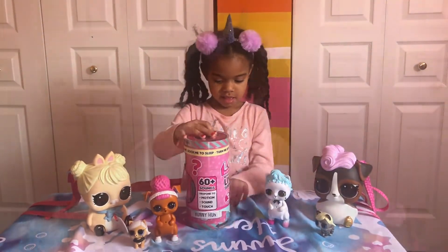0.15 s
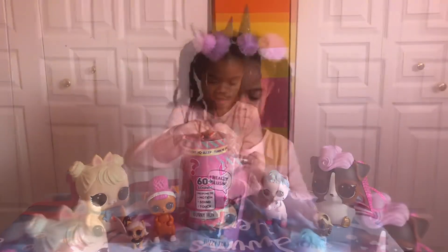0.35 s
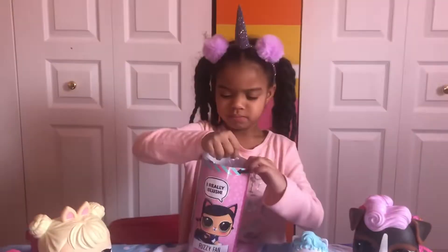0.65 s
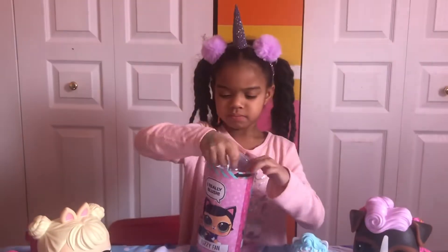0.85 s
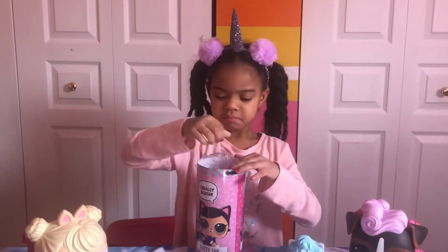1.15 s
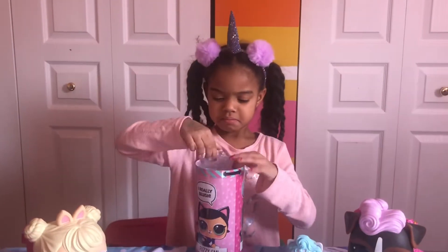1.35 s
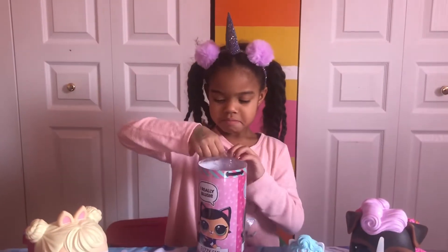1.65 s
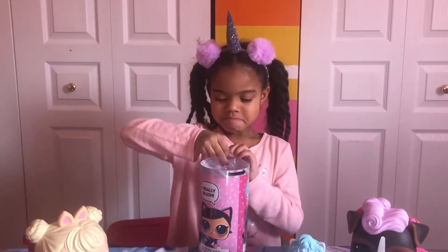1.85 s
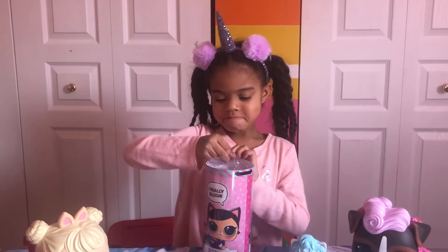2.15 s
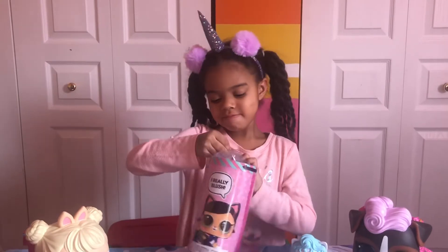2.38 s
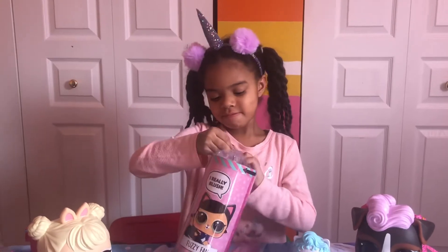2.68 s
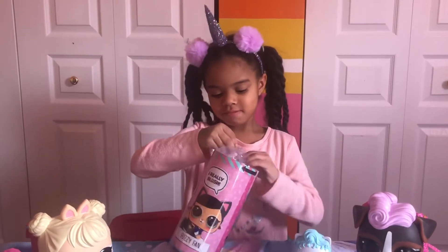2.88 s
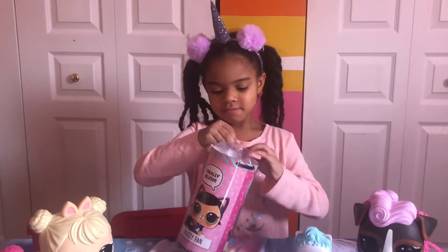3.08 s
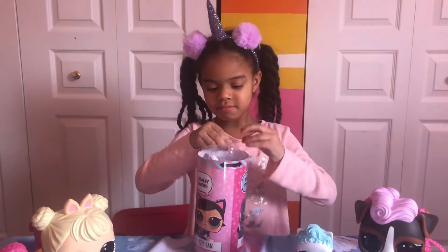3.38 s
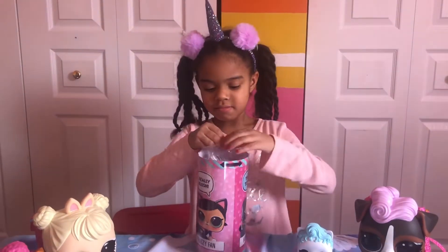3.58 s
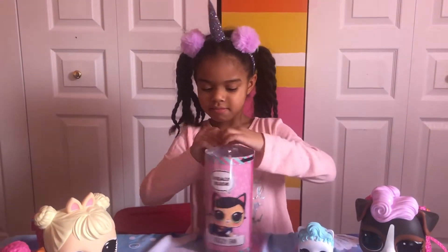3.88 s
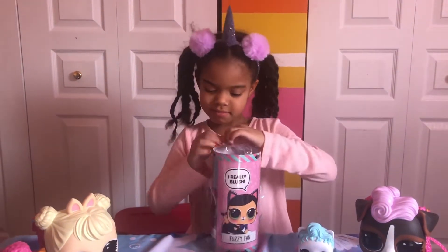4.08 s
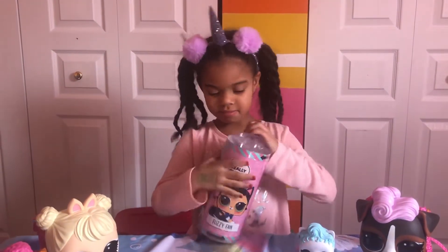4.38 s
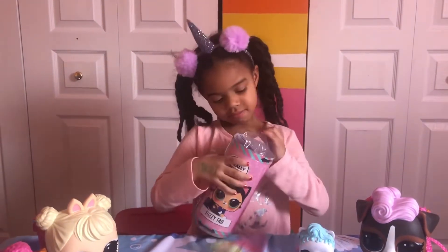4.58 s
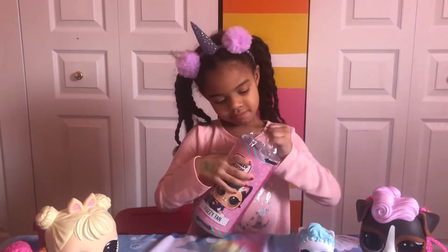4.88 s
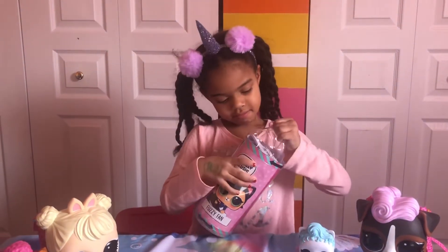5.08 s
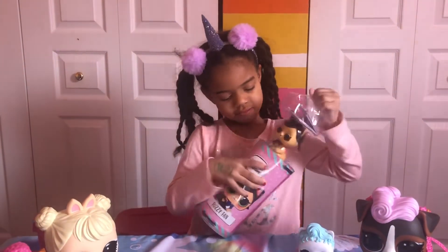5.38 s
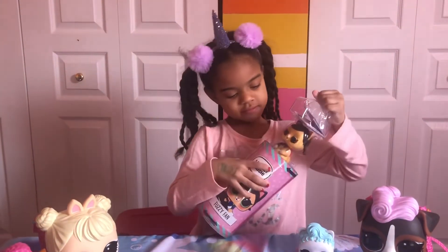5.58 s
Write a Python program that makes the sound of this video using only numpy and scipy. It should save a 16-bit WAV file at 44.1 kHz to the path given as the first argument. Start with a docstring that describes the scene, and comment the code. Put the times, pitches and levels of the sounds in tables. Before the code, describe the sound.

A small room with quiet air and a faint low rumble that swells briefly at the start. Fingers grip stiff plastic in a hollow tube: soft crinkling, then a dense rustle at 0.3 s and hard, hollow pops from 0.5 to 0.7 s. From 0.85 to 2 s there is only light rubbing and small ticks. A sharp, bright snap at 2.1 s leads into busy crinkling until about 2.45 s. The tube wall judders low at 2.5 s and again around 3 to 3.3 s, with a crack at 2.8 s and fine rim ticks. After quieter fumbling, thin squeaks near 3 kHz chirp at 4.1 to 4.25 s. Cracks gather from 4.26 to 4.9 s, then the strongest cluster bursts at 5.14 to 5.26 s, with a soft low puff of air. Light crinkling follows, and a last snap at 5.68 s. Close microphone, short bright reflections.

```python
"""A small room, where stiff clear plastic is prised out of a tube-shaped container by hand.
The sheet buckles in short cracks: each is a bright noise burst, a ringing facet and a thump of tube modes.
Between them the fingers work the plastic: clicks crinkle, filtered slips rub, unsteady whistles squeak.
Later the tube wall judders, the rim ticks over the lip and a soft puff of air follows.
The microphone hears these directly, with the room's reflections over quiet air and a low rumble."""
import sys
import numpy as np
from scipy import signal
from scipy.fft import rfft, irfft
from scipy.io import wavfile

SR = 44100
rng = np.random.default_rng(int(sys.argv[2]) if len(sys.argv) > 2 else 0)


def pcm_store(signal):
    """Save signal as 16-bit PCM."""
    levels = np.round(np.clip(np.atleast_2d(signal), -1, 1) * 32767)
    wavfile.write(sys.argv[1], SR, levels.astype(np.int16).T)


N = 253273
TIME = np.arange(N) / SR  # s


def amp(db):
    """Decibels to gain."""
    return 10 ** (np.asarray(db) / 20)


def evened(x):
    """Scales to rms 1."""
    return x / np.sqrt(np.mean(x ** 2) + 1e-20)


def at_level(x, db, span_s=0.01):
    """Gives a short sound the energy of a steady sound of that rms level lasting span_s."""
    return amp(db) * x * np.sqrt(span_s * SR / (np.sum(x ** 2) + 1e-20))


def read(points, hz):
    """Reads a table of values against frequency on a log-frequency axis."""
    f, value = np.transpose(points)
    return np.interp(np.log(hz + 1), np.log(f + 1), value)


def add(mix, s, sound):
    """Mixes a sound in at time s."""
    part = mix[max(round(s * SR), 0):][:len(sound)]
    part += sound[:len(part)]


def colour(x, spectrum, size=4096):
    """Causal (minimum-phase) filter with the given spectrum."""
    log_gain = np.log(amp(read(spectrum, abs(np.fft.fftfreq(size, 1 / SR)))))
    taps = np.fft.ifft(np.exp(np.conj(signal.hilbert(log_gain)))).real
    return signal.fftconvolve(x, taps[:size // 2])[:len(x)]


def resonate(x, hz, width_hz):
    """One damped mode: a two-pole resonance."""
    r = np.exp(-np.pi * width_hz / SR)
    return signal.lfilter([1 - r, 0, r - 1], [1, -2 * r * np.cos(2 * np.pi * hz / SR), r * r], x)


def wander(rate_hz):
    """Random values of rms 1 drawn at rate_hz and joined by straight lines."""
    knots = rng.standard_normal(N)
    return np.interp(TIME * rate_hz, np.arange(N), knots)


def grains(per_s, spread_db):
    """Random clicks of either sign, mostly small and a few large."""
    size = amp(spread_db * np.minimum(rng.exponential(1, N), 4)) * rng.choice([-1, 1], N)
    happens = rng.random(N) < per_s / SR
    return evened(size * happens)


# spectrum of the room air: (frequency [Hz], relative density [dB per Hz])
AIR_SPECTRUM = [(30, -12), (250, 5), (600, -6.5), (1500, -4.5), (4000, -14), (9000, -21.5), (16000, -34)]
# spectrum of the low rumble: (frequency [Hz], relative density [dB per Hz])
RUMBLE_SPECTRUM = [(15, -32), (50, -4), (85, 0.5), (140, 1), (300, -12), (1000, -35)]
RUMBLE_FLOOR_DB = -66
SWELL_DB, SWELL_PEAK_S, SWELL_WIDTH_S = -52.5, 0.088, 0.22


def background(air_db=-66):
    """Quiet room air, and a low rumble that swells once and soon settles to a steady floor."""
    air, low = rng.standard_normal((2, N))
    swell = amp(SWELL_DB) * np.exp(-((TIME - SWELL_PEAK_S) / SWELL_WIDTH_S) ** 2)
    rumble = np.hypot(amp(RUMBLE_FLOOR_DB), swell)
    return amp(air_db) * evened(colour(air, AIR_SPECTRUM)) + rumble * evened(colour(low, RUMBLE_SPECTRUM))


# grips of the fingers, levels before swell and trim:
# (start time [s], length [s], crinkling level [dB], tube rubbing level [dB])
FINGER_GRIPS = [(.01, 0.15, -67, -62), (0.11, 0.16, -49.5, -53.5), (0.325, 0.12, -39.5, -44),
                (0.484, 0.28, -47.5, -59), (0.853, 0.072, -62, -50.5), (0.995, 0.027, -60, -59),
                (1.195, 0.075, -56.5, -47), (1.365, 0.0096, -59, -75), (1.445, 0.11, -59.5, -61),
                (1.588, 0.066, -49.5, -55.5), (1.733, 0.079, -54.5, -50), (1.889, 0.024, -51, -49),
                (1.976, 0.037, -55.5, -57), (2.059, 0.035, -48.5, -52.5), (2.115, 0.17, -42, -50),
                (2.295, 0.22, -49, -43.5), (2.543, 0.18, -61, -53.5), (2.683, 0.069, -48, -49),
                (2.874, 0.14, -64, -52.5), (3.045, 0.23, -70, -59), (3.227, 0.2, -59.5, -61),
                (3.504, 0.023, -54, -56), (3.585, 0.04, -52.5, -45), (3.723, .14, -50.5, -54.5),
                (3.942, 0.033, -61, -50.5), (4.027, 0.47, -62, -60.5), (4.273, 0.052, -54, -57),
                (4.513, 0.089, -63, -50), (4.624, 0.19, -49.5, -55), (4.739, 0.17, -48, -50),
                (4.927, 0.071, -54.5, -49.5), (5.039, 0.16, -55, -49.5), (5.14, 0.23, -48, -61),
                (5.304, 0.12, -53.5, -50), (5.426, 0.049, -57, -55), (5.533, 0.056, -47.5, -52),
                (5.653, 0.24, -48, -55)]
GRIP_ATTACK_S, GRIP_RELEASE_S, GRIP_SWELL_DB = 0.011, 0.027, 2.5
RESTING_DB = -78.5  # the fingers only holding on


def gripping(index):
    """Strength of the fingers' work from one level column: each grip takes hold, tightens and lets go."""
    power = np.full(N, amp(RESTING_DB) ** 2)
    for row in FINGER_GRIPS:
        age, length = TIME - row[0], row[1]
        attack = np.clip(age / GRIP_ATTACK_S, 0, 1)
        tightening = amp(GRIP_SWELL_DB * (np.clip(age / length, 0, 1) - 1.5))
        release = np.exp(-np.maximum(age - length, 0) / GRIP_RELEASE_S)
        power += (amp(row[index]) * attack * tightening * release) ** 2
    return np.sqrt(power)


# spectrum of the fine crinkling: (frequency [Hz], relative density [dB per Hz])
CRINKLE_SPECTRUM = [(150, -5), (400, -11), (700, 8), (1200, -3), (2000, 4.5), (3500, 6), (6000, 1),
                    (9500, -8), (11000, -3), (14000, -13.5), (16500, -20)]


def crinkling(db=1, per_s=600, spread_db=5.5, clump_db=3.5, facet_db=0, facet_q=11,
              rush_db=-44, rush_per_s=2000, rush_spread_db=4.0):
    """Tiny creases give way in clumps, on facets of many sizes; under hard work they merge into a rush."""
    facets = sum(evened(resonate(grains(per_s / 20, spread_db), hz, hz / facet_q))
                 for hz in np.geomspace(1100, 8500, num=20))
    bare_ticks = evened(colour(grains(per_s, spread_db), CRINKLE_SPECTRUM))
    ticks = evened(bare_ticks + amp(facet_db) * evened(facets))
    rush = evened(colour(grains(rush_per_s, rush_spread_db), CRINKLE_SPECTRUM))
    effort = gripping(index=2)
    merged = effort / (effort + amp(rush_db))  # share of the power in the rush
    texture = np.sqrt(1 - merged) * ticks + np.sqrt(merged) * rush
    return amp(db) * effort * evened(texture * amp(clump_db * wander(60)))


# judders of the tube wall as the insert drags past, peak level before trim:
# (start time [s], length [s], level [dB])
WALL_JUDDERS = [(2.486, .135, -46), (2.976, 0.347, -44), (4.95, 0.084, -52)]
JUDDER_HZ, JUDDER_DIP_DB = 15.4, 10.5


def juddering():
    """Strength of the wall's flexing: within each judder it swells and dips at a steady rate."""
    out = np.zeros(N)
    for s, length, db in WALL_JUDDERS:
        t = np.arange(0, length, 1 / SR)
        add(out, s, amp(db - JUDDER_DIP_DB * np.cos(np.pi * JUDDER_HZ * t) ** 2))
    return out


# spectrum of rubbing on the tube: (frequency [Hz], relative density [dB per Hz])
RUB_SPECTRUM = [(100, -38.5), (190, -12.5), (255, 4.5), (310, -8.5), (360, -5.5), (430, 1), (560, -14.5),
                (800, -18.5), (1200, -12), (2200, -20), (5000, -62)]


def rubbing(db=-2, flex_db=-2, flex_hz=145, flex_width_hz=22):
    """The insert drags along the tube in small slips, and the wall flexes with a low note."""
    slips = amp(db) * gripping(index=3) * evened(colour(grains(400, 7.6), RUB_SPECTRUM))
    wall = signal.hilbert(resonate(rng.standard_normal(N), flex_hz, flex_width_hz))
    steady = evened(np.cos(np.angle(wall)))  # keeps the wavering pitch, drops the wavering level
    note = steady * juddering()
    return slips + amp(flex_db) * resonate(resonate(note, flex_hz, 84), flex_hz, 71)


# reverberation of the room: (frequency [Hz], time to fall 60 dB [s])
ROOM_DECAY = [(200, 0.3), (530, 0.43), (1400, 0.48), (3700, 0.4), (9700, 0.27), (16000, 0.53)]
# colour of the reflections: (frequency [Hz], gain [dB])
REFLECTION_COLOUR = [(100, -6.5), (270, 2), (700, 3), (1300, -0.5), (2500, -3.5), (5000, -1.5), (9000, 0.5),
                     (16000, -8)]


def room_tail(first_s=0.00022, build_s=0.0048, near=1.0, near_s=0.03, size=256):
    """Dense reflections, boosted early by the nearby table and doors; each band dies at its own rate."""
    t = np.arange(SR) / SR
    shape = np.clip((t - first_s) / build_s, 0, 1) * (1 + near * np.exp(-t / near_s))
    taps = rng.choice([-1, 1], SR) * (rng.random(SR) < 6000 / SR) * shape
    hz, when, z = signal.stft(taps, SR, nperseg=size)
    fall_db = -60 * when / read(ROOM_DECAY, hz)[:, None]
    tail = signal.istft(z * amp(fall_db), SR, nperseg=size)[1]
    return colour(tail / np.linalg.norm(tail), REFLECTION_COLOUR)


def room(x, wet_db=-3, changes_per_s=7, count=3):
    """As the hands and tube move about, the sound passes from one pattern of reflections to the next."""
    shares = [np.sqrt(2 / count) * np.cos(np.pi * (changes_per_s * TIME + k / count)) for k in range(count)]
    return amp(wet_db) * sum(signal.fftconvolve(x * share, room_tail())[:N] for share in shares)


# modes of the tube: (frequency [Hz], relative level [dB], time to fall 60 dB [s])
TUBE_MODES = [(251, 8, 0.12), (267, 5, 0.072), (310, 3.5, 0.077), (383, 13, 0.004), (426, 11.5, 0.019),
              (496, 13.5, 0.0089), (540, -8, 0.0058), (676.5, 3.5, 0.026), (754, -6.5, 0.02)]
# the more a crack rings its facet rather than pushing the tube, the higher the tube modes it favours
THUMP_HZ, THUMP_RANGE_OCTAVES, THUMP_RANGE_DB = 417, 0.46, 10


def tube_thump(t, ring, thump, build_s=0.00098, focus_db=7, vary_db=0.3):
    """Decaying tube modes, strongest near the pitch of the push, through the bass-shy tube."""
    push_hz = THUMP_HZ * 2 ** (THUMP_RANGE_OCTAVES * np.tanh((ring - thump) / THUMP_RANGE_DB))
    tube = np.zeros(len(t))
    for f, db, t60 in TUBE_MODES:
        level = db + vary_db * rng.standard_normal() - focus_db * abs(np.log2(f / push_hz))
        tube += amp(level - 60 * t / t60) * np.sin(2 * np.pi * f * t)
    build = 1 - np.exp(-t / build_s)  # the whole tube takes a moment to start moving
    radiated = signal.butter(3, [215, 1300], "band", fs=SR)  # a small tube radiates little bass
    return signal.lfilter(*radiated, tube * build)


def smoothed(x, share):
    """Levels the peaks and dips in the spectrum of a burst, keeping its phase."""
    z = rfft(x)
    return irfft(z / (abs(z) + 1e-9) ** np.clip(share, 0, 1), len(x))


def edge_echo(x, echo=0.44, shortest_s=0.000487, longest_s=0.001284):
    """The bending wave returns inverted from the sheet's edge and ripples each crack's spectrum."""
    lag_s = rng.uniform(shortest_s, longest_s)
    return irfft(rfft(x) * (1 - echo * np.exp(-2j * np.pi * np.fft.rfftfreq(len(x), 1 / SR) * lag_s)))


# spectrum of a snap before its tilt: (frequency [Hz], relative density [dB per Hz])
SNAP_SPECTRUM = [(40, -47), (300, -42), (1200, 5), (2300, -1.5), (3300, 3), (5500, -0.5), (7500, -4),
                 (9500, -5), (10800, -11), (14000, -14.5), (16500, -26)]
# overtones of a buckled facet, which colour the snap: (ratio to its pitch, level [dB])
FACET_OVERTONES = [(1.56, 4), (2.55, -0.5), (3.8, -13.5)]
# cracks of the sheet, levels before trim: (time [s], length [s], snap level [dB], snap tilt [dB per octave],
# facet ring level [dB], facet pitch [Hz], tube thump level [dB])
SHEET_CRACKS = [(0.104, 0.0027, -51.5, 5, -61, 2270, -51.5), (0.279, 0.01, -48.5, 4.5, -51, 2480, -48.5),
                (0.336, 0.004, -45, 2.5, -55, 2380, -41), (.512, 0.0013, -58, -8, -38, 1370, -32.5),
                (0.537, 0.0023, -42.5, 3, -61, 2500, -59), (0.5653, 0.0011, -33, -0.5, -61, 1400, -60),
                (.613, 0.0015, -28.5, -4, -25.5, 1065, -21.5), (.6502, 0.0034, -23.5, -8, -23, 1166, -27.5),
                (.7088, 0.0015, -31, 4, -37, 960, -45), (0.8693, 0.0063, -49, -3, -52, 986, -36.5),
                (1.041, 0.0035, -52, -4.5, -58, 980, -46.5), (1.195, 0.014, -53.5, 0.5, -52, 1710, -37.5),
                (1.244, 0.0012, -45, -1, -48, 1080, -38.5), (1.503, 0.032, -50, -1, -54, 2050, -48.5),
                (1.6047, 0.0018, -46, -1.5, -50, 2080, -60), (1.696, 0.0041, -48, 2, -52.5, 1900, -50.5),
                (1.735, 0.0037, -43.5, 4.5, -46.5, 1270, -39.5),
                (1.977, 0.0039, -53.5, 1.5, -60, 1750, -57), (2.0435, 0.0043, -50, -1.5, -66, 1950, -63),
                (2.1166, 0.0023, -21, 1.5, -23, 1340, -42), (2.168, 0.0041, -60, -3, -49, 1370, -29),
                (2.1867, 0.0014, -37.5, 1.5, -41.5, 1080, -44), (2.242, .0044, -43, 3, -46, 1170, -41),
                (2.26, .004, -49, 2, -50, 1810, -52), (2.315, 0.0036, -48, 1, -48, 2540, -68),
                (2.368, .0068, -48.5, 15, -44, 2900, -42), (2.384, 0.009, -46, 20, -42.5, 2780, -51),
                (2.41, 0.0061, -40.5, 0, -67, 2300, -44), (2.442, 0.0061, -41.5, 3, -64, 2380, -65),
                (2.5196, 0.015, -52, -3, -69, 1960, -39.5), (2.724, 0.0079, -54, -14, -56, 1800, -54.5),
                (2.8287, 0.0045, -36, -0.5, -35.5, 1234, -28.5), (2.891, 0.0023, -51, 1, -62, 1240, -40),
                (2.975, 0.0033, -51, 2, -75, 1590, -42.5), (3.122, 0.0026, -53.5, -4, -63, 1880, -40.5),
                (3.27, 0.0023, -42, -2.5, -43.5, 1020, -39.5), (3.287, 0.007, -48, -6, -50, 1210, -37),
                (3.582, 0.0063, -51.5, -4, -56.5, 1070, -50), (3.7133, 0.013, -49.5, 2, -58.5, 1810, -49.5),
                (4.263, 0.0019, -34, -3.5, -33.5, 1460, -36), (4.3385, 0.0016, -56, 13, -46.5, 2000, -53),
                (4.3489, 0.003, -38.5, 3, -34, 1224, -36.5), (4.452, 0.00033, -47, -0.5, -74, 1970, -72),
                (4.47, 0.0034, -42.5, -8, -58, 2020, -62), (4.4772, 0.0018, -31.5, 6, -30.5, 2250, -58),
                (4.561, 0.0041, -40, 3.5, -60, 2330, -69), (4.577, .004, -58, 0, -59, 1226, -44),
                (4.6, 0.0025, -40, 9, -41, 1960, -58), (4.6096, 0.00048, -35.5, 2, -31.5, 1990, -40.5),
                (4.664, .005, -40, -5, -36, 1470, -41.5), (4.67, .0059, -38, 6, -29, 1050, -33.5),
                (4.721, 0.002, -26.5, 8, -28, 2160, -38), (4.856, 0.0013, -47.5, 4, -47, 2210, -54),
                (4.864, .0056, -41, -1, -43.5, 916, -40.5), (5.1379, 0.00086, -26, 6.5, -34.5, 1980, -42.5),
                (5.1658, 0.00087, -21.5, 5.5, -26.5, 2470, -38),
                (5.1726, 0.0078, -38, 13, -24.5, 1300, -30.5), (5.18, 0.0014, -31.5, 11, -30, 2370, -32),
                (5.2055, 0.0012, -20.5, -3, -23.5, 681, -19.5),
                (5.2083, 0.0037, -20.5, 0.5, -21, 1180, -18), (5.224, .027, -39, 5, -27, 1090, -49),
                (5.256, 0.012, -27.5, -5, -42, 2200, -45), (5.5144, 0.0033, -47, 0, -56, 2440, -53.5),
                (5.594, 0.0042, -49.5, -14, -50.5, 880, -67), (5.6753, 0.0019, -21.5, 1, -26, 1490, -39)]


def cracks(snap_db=2.5, ring_db=2.5, thump_db=-1, ring_q=7.0, diffuse_q=2.7, overtone_q=2.44,
           tube_lag=0.00066, evenness=0.33, size=4096):
    """A fold bursts into tiny snaps, rings its facet, then shakes the tube.
    Returns the sound sent to the microphone and the sound sent round the room."""
    out, t = np.zeros((2, N)), np.arange(size) / SR
    lead = size // 16  # samples of room before the burst
    octaves = np.log2(np.clip(np.fft.rfftfreq(size, 1 / SR), 2500, 12000) / 5000)
    for s, length, snap, tilt_db, ring, hz, thump in SHEET_CRACKS:
        envelope = np.exp(-(t / max(length, 1 / SR)) ** 4)
        burst = np.roll(rng.standard_normal(size) * envelope, lead)
        tube = at_level(tube_thump(t, ring, thump), thump + thump_db)
        # in one direction the snaps interfere; summed over all directions their spectrum is even
        for path, share, q in zip(out, (evenness, 1), (ring_q, diffuse_q)):
            drive = smoothed(burst, share)
            tilted = irfft(rfft(drive) * amp(tilt_db * octaves))
            crack = edge_echo(colour(tilted, SNAP_SPECTRUM, size=1024))
            crack = crack + sum(amp(db) * resonate(crack, hz * ratio, hz * ratio / overtone_q)
                                for ratio, db in FACET_OVERTONES)
            facet = resonate(resonate(drive, hz, hz / q), hz, hz * 1.71)
            add(path, s - lead / SR, at_level(crack, snap + snap_db) + at_level(facet, ring + ring_db))
            add(path, s + tube_lag, tube)
    return out


# stick-slip squeaks: (start time [s], length [s], first pitch [Hz], last pitch [Hz], level [dB],
# unsteadiness [share of the pitch])
PLASTIC_SQUEAKS = [(0.445, 0.052, 10250, 8840, -44, 0.083), (0.543, 0.011, 4930, 5440, -39, 0.042),
                   (2.224, 0.024, 4700, 4270, -42.5, 0.024), (3.87, 0.42, 3185, 3194, -64, 0.051),
                   (4.073, 0.053, 3280, 3210, -44, 0.017), (4.12, 0.037, 3258, 3258, -39.5, 0.01),
                   (4.172, 0.022, 3220, 3280, -41.5, 0.011), (4.209, 0.072, 3260, 3250, -49.5, 0.0052),
                   (5.098, 0.022, 5400, 5270, -49, 0.0072)]


def squeaks(db=0):
    """Plastic sticks and slips on plastic: thin whistles, unsteady in pitch and level."""
    out, jitter = np.zeros(N), wander(700)
    flutter = amp(1.5 * wander(150))
    for s, length, first_hz, last_hz, squeak_db, unsteady in PLASTIC_SQUEAKS:
        span = (TIME >= s) & (TIME < s + length)
        hz = np.linspace(first_hz, last_hz, span.sum()) * (1 + unsteady * jitter[span])
        tone = evened(np.sin(2 * np.pi * np.cumsum(hz) / SR) * flutter[span])
        add(out, s, amp(db + squeak_db) * tone * signal.windows.tukey(len(hz), .5))
    return out


# spectrum of one slip of the rim: (frequency [Hz], relative density [dB per Hz])
SLIP_SPECTRUM = [(300, -18), (1200, -6), (2200, 8), (5500, -2), (8000, -10), (9700, -2), (10800, -14),
                 (16000, -18)]
# the rim of the insert slips notch by notch over the lip of the tube: (time [s], level [dB])
RIM_SLIPS = [(2.925, -50), (2.931, -54), (2.98, -54), (2.99, -52), (3.0498, -48.5), (3.0604, -58),
             (3.069, -53), (3.0833, -51.5), (3.1064, -54), (3.1656, -49.5), (3.1815, -54), (3.2525, -53)]


def slipping(db=0, length_s=0.0013, push_db=0, size=4096):
    """Each slip is a thin, bright tick that also nudges the tube."""
    out, t = np.zeros(N), np.arange(size) / SR
    for s, slip_db in RIM_SLIPS:
        burst = rng.standard_normal(size) * np.exp(-t / length_s)
        tick = at_level(colour(burst, SLIP_SPECTRUM), slip_db + db)
        nudge = at_level(colour(burst, RUB_SPECTRUM), slip_db + push_db)
        add(out, s, tick + nudge)
    return out


def puff(s=5.19, db=-49, hz=110, width_hz=70, decay_s=0.11):
    """Air is drawn into the tube as the insert comes free: low resonant noise that rises and dies away."""
    age = np.maximum(TIME - s, 0) / decay_s
    air = resonate(resonate(rng.standard_normal(N), hz, width_hz), hz, width_hz)
    return amp(db) * np.minimum(10 * age, 1) * np.exp(-age) * evened(air)


def scene():
    """All the sounds of the packaging, direct and round the room; puff and background stay direct."""
    direct, around = cracks()
    fingers = crinkling() + slipping() + rubbing() + squeaks()
    return (direct + fingers + room(around + fingers) + puff() + background())[None]


def record(dry, ceiling=0.7, edge_hz=16200):
    """The sharpest peaks round off softly below the ceiling; then the band limit of the recorder."""
    rounded = dry / (1 + (dry / ceiling) ** 4) ** .25
    low_pass = signal.firwin(255, edge_hz, window=("kaiser", 9), fs=SR)
    return signal.oaconvolve(rounded, low_pass[None], "same")


dry = scene()
out = record(dry)
pcm_store(out)
```